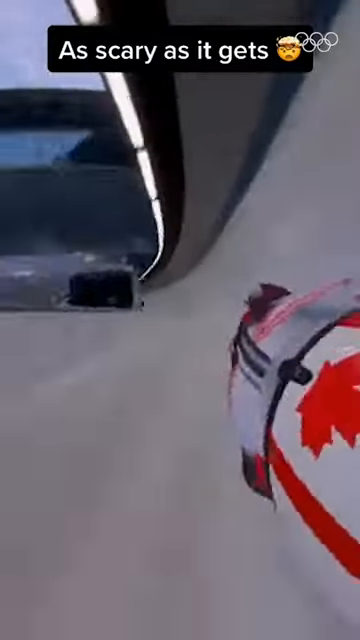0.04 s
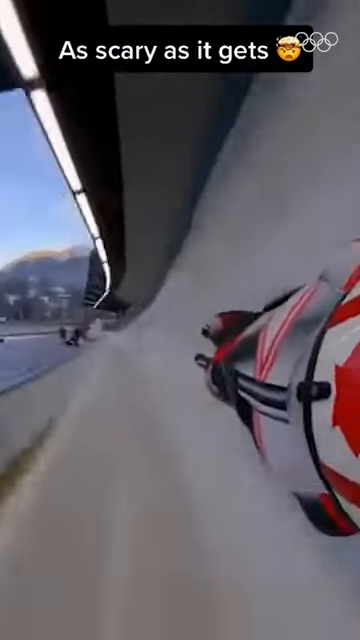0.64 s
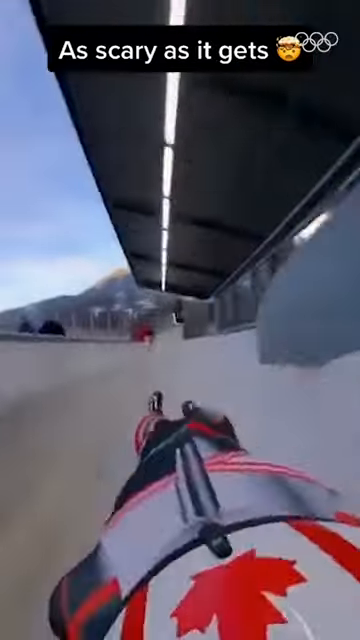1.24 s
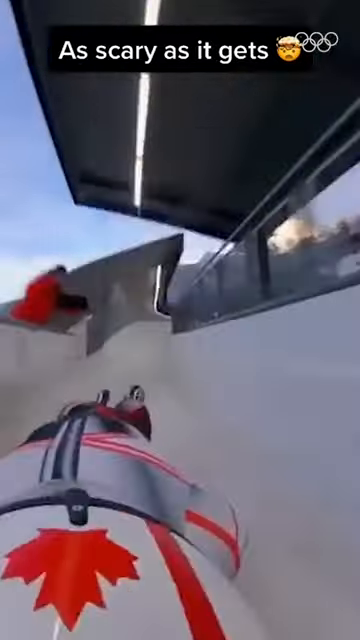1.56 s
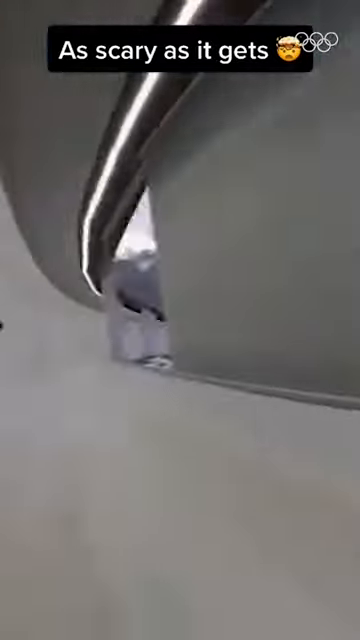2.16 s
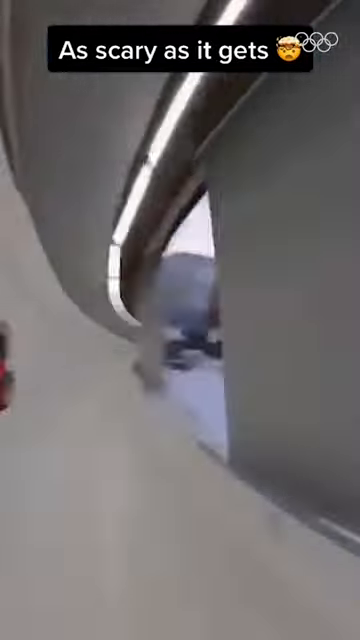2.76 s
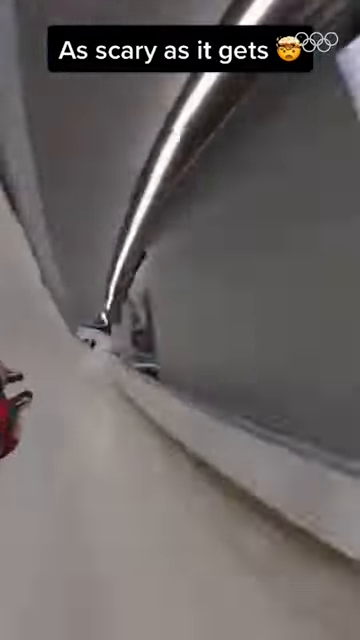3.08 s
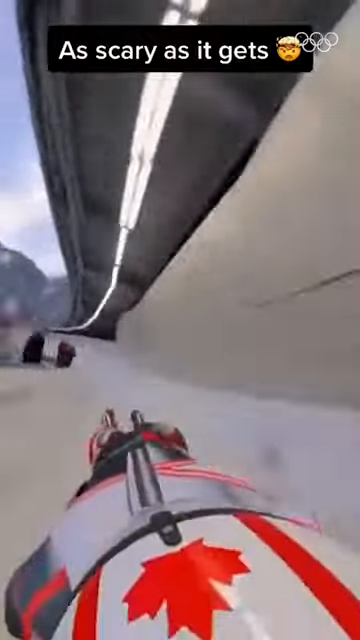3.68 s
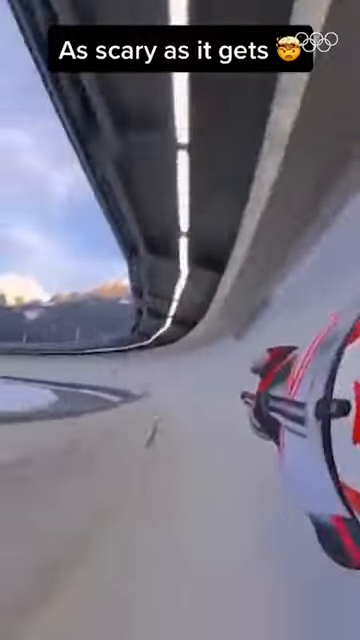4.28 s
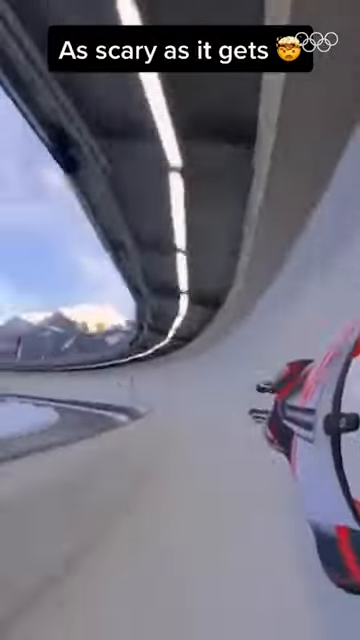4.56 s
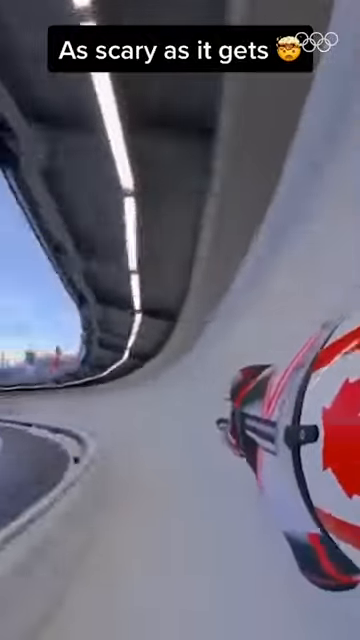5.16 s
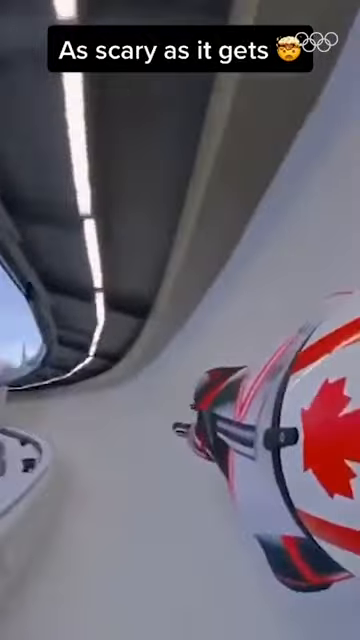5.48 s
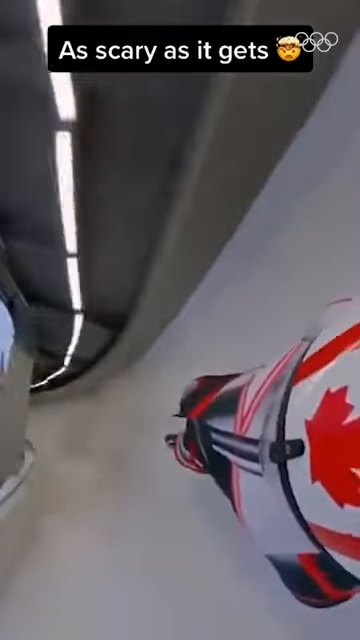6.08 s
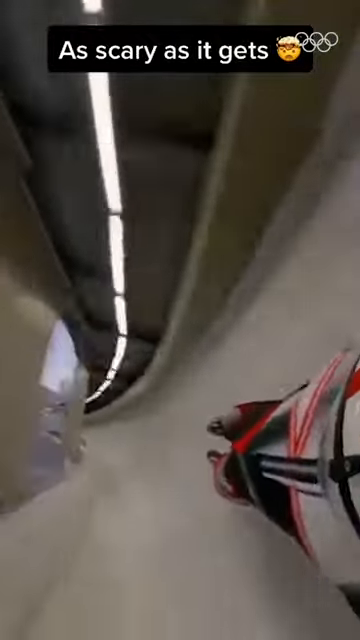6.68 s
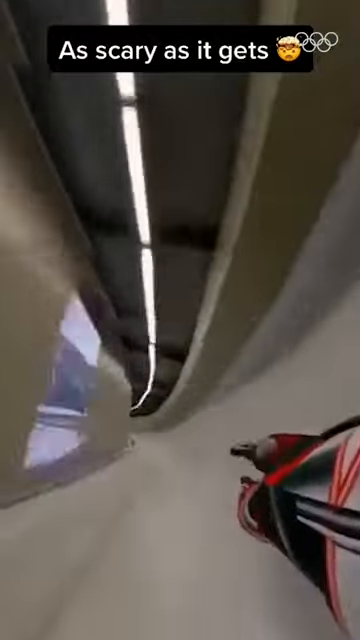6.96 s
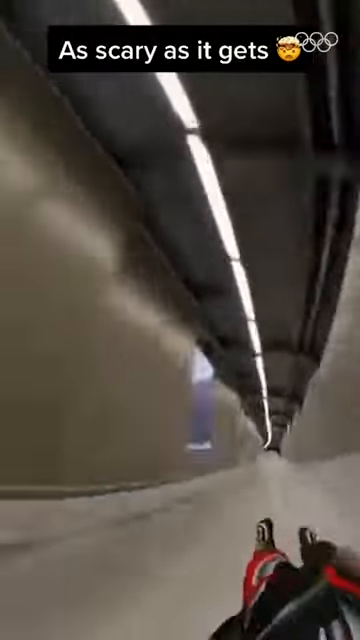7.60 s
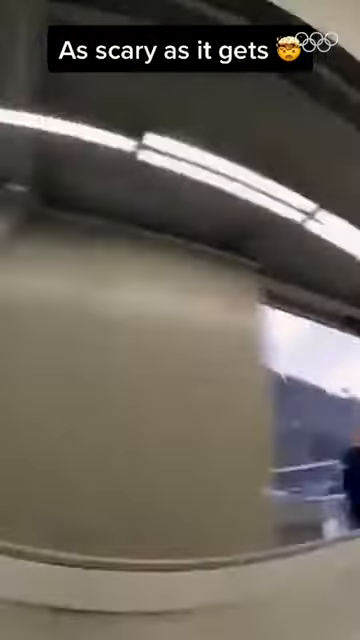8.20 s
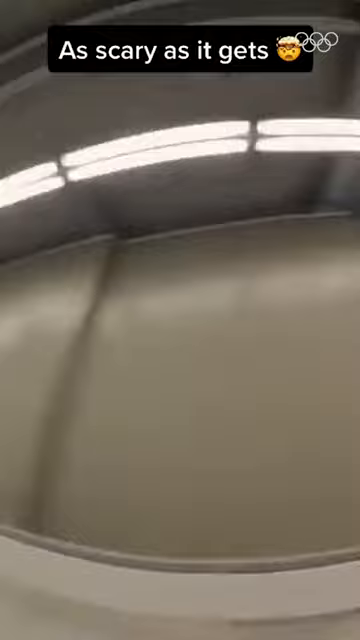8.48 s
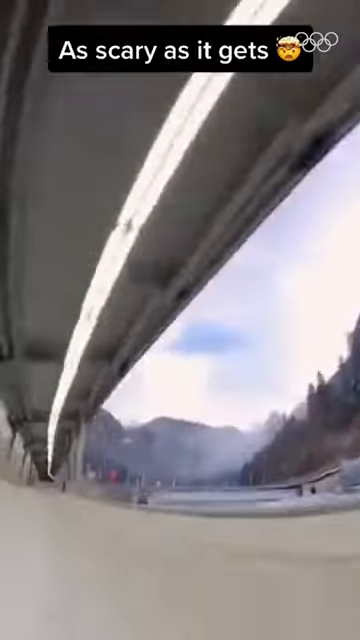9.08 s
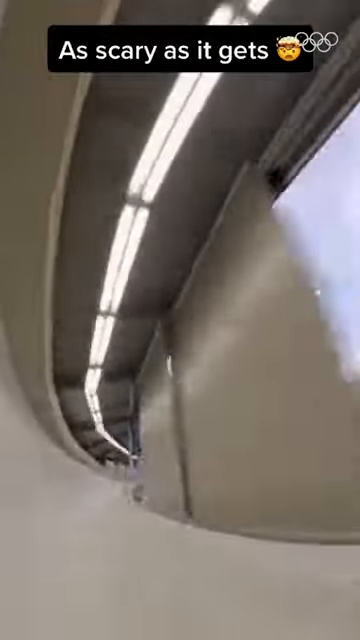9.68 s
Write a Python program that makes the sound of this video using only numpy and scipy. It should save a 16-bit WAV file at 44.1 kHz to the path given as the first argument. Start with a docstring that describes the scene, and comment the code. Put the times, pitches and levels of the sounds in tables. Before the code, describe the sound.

Gusty wind tears at the microphone over sled runners hissing on ice, then turns into a loud, deep, thudding buffet.

```python
"""Thin, gusty air tears at each port of a two-port microphone, over the hiss of steel runners on ice.
The microphone rides just behind the slider's helmet as a sled races down an ice track.
Just before 4 s a deep, fluttering buffet of large eddies swallows both ports, thudding and ripping;
from then on the runners only break through in a few short scrapes."""
import sys
import numpy as np
from scipy import signal
from scipy.fft import rfft, irfft, next_fast_len
from scipy.io import wavfile
from scipy.ndimage import uniform_filter1d

SR = 44100
rng = np.random.default_rng(int(sys.argv[2]) if len(sys.argv) > 2 else 0)


def store_pcm(level_fs):
    """Save levels as 16-bit WAV."""
    pcm = np.round(np.clip(level_fs, -1, 1) * 32767).astype(np.int16)
    wavfile.write(sys.argv[1], SR, np.atleast_2d(pcm).T)


N = 438354
GLIDE_END_S, BLAST_START_S = 3.775, 3.85
# Bands in which noise is brought to unit level, lower and upper edge in Hz.
BODY_BAND, BUFFET_BAND, TEAR_BAND, ICE_BAND = (150, 1500), (60, 1500), (1300, 4000), (6000, 9700)

# Air rips across the right port and the flow collapses behind it.
# Each row: time in seconds, level in dB, length in seconds, lift of the blast in dB, collapse in dB.
RIPS = [(3.849, -10.5, 0.016, 3, 1), (3.954, -19, 0.01, -1, -4), (3.975, -15.5, 0.0094, -5, -0.5),
        (4.469, -19, .01, 3.5, -2), (5.042, -19, .01, 0, -3), (5.653, -20, 0.051, 1.5, -1),
        (5.929, -18, 0.013, -7, -4), (6.173, -27, 0.01, 6, -10), (6.306, -24, 0.015, 4, -1.5),
        (6.533, -29, 0.0047, 4, -4.5), (6.621, -21, 0.013, 2, -4), (6.885, -32, 0.033, -0.5, -2),
        (6.917, -20, 0.015, 4, -1), (6.948, -16, 0.0099, 5, -9), (7.021, -18, 0.015, -0.5, -0.5),
        (7.056, -14.5, 0.04, 3, -5), (7.12, -27, 0.013, 3, -2), (7.219, -21, 0.038, 4.5, -3),
        (7.289, -23, 0.012, 0, 0.5), (7.389, -10, 0.022, 1.5, -0.5), (7.468, -14.5, 0.023, -2, 0),
        (7.656, -16, 0.021, 2, -4), (7.936, -24, 0.016, 1, -9), (7.988, -25, .012, -2, -2),
        (8.1, -17, 0.044, 0, -1), (8.421, -17, .01, 4, 0.5), (8.678, -30, 0.016, 2, -2),
        (8.731, -15.5, 0.028, 1, -11), (9.051, -12.5, .0085, 6, -4), (9.086, -20, 0.009, 6, 2.5)]
# The heaviest thuds of the buffet.
# Each row: time in seconds, change in dB, length in seconds, suction at its heart in dB.
THUDS = [(3.889, 4, .012, -12), (4.173, 3.5, 0.022, -7), (4.27, 1.5, 0.017, -4), (4.521, 2, 0.013, -7),
         (4.614, 1.5, 0.05, -9), (4.763, -3, .014, -4), (4.87, 1.5, 0.052, -10), (5.215, 3.5, 0.015, -3),
         (5.276, 1, 0.017, -4), (5.388, 3.5, .016, -13), (5.593, 2.5, 0.026, -3), (5.838, 1.5, .014, -12),
         (6.355, 4, .014, -8), (6.482, 6, 0.016, -11), (6.773, 5.5, 0.012, -5), (7.128, 5, .006, -4.5),
         (7.163, -2, 0.013, -3), (7.219, 1, .006, -12), (7.265, -4, .005, -11), (7.393, -2, .008, -11),
         (7.704, 5.5, 0.016, -10), (8.004, 3, 0.022, -4), (8.176, 2, 0.053, -11), (8.533, 5.5, 0.012, -12),
         (9.431, 4.5, .024, -14), (9.614, 3.5, 0.019, -8), (9.84, 2.5, .04, -5)]
# Tight vortices that hit both ports. Each row: time in seconds, level in dB, pitch in Hz.
SMACKS = [(3.95, -4, 650), (4.103, -8, 700), (5.1694, -5.5, 620), (5.947, -7, 900), (5.987, -12, 700),
          (6.2637, -1, 700), (6.5305, -6, 800), (6.8995, -3, 800), (6.9498, -4, 600), (7.003, -13, 700),
          (7.051, -5, 900), (7.283, -8, 800), (7.3675, -8, 700), (7.4467, -7, 900), (8.416, -7, 900),
          (8.961, -7, 800), (9.154, -6, 700)]
# Air sizzling, tearing and hissing at a port. Each row: frequency in Hz, spectral level in dB.
SIZZLE_COLOUR = [(150, -30), (600, -8.5), (1300, 0), (2500, 0.5), (4000, -2.5), (6000, -10), (7000, -10),
                 (9500, -10.5)]
TEAR_COLOUR = [(20, -8), (100, -15.5), (250, -16), (500, -7.5), (950, 1.5), (1500, 0.5), (2500, -2.5),
               (4000, -8), (6000, -12.5), (9500, -23)]
HISS_COLOUR = [(500, -21), (2000, -4.5), (4000, -4.5), (5600, -3.5), (7500, -0.2), (9500, 0.5)]


def blast():
    """Large eddies press on both ports, the right one first; small ones tear at each port alone."""
    # The full wind. Each row: time in seconds, then buffet, tearing and hiss levels in dB.
    wind_levels = [(3.88, -16.5, -23, -25), (4.46, -17, -23.5, -21), (4.97, -17, -24.5, -23.5),
                   (5.15, -20, -30, -22.5), (5.2, -16.5, -21, -24.5), (7.47, -18, -17.5, -26),
                   (7.52, -19.5, -19, -23.5), (8.2, -17.5, -18.5, -25), (8.33, -19.5, -19, -25),
                   (8.71, -18, -16.5, -24.5), (8.84, -19, -18, -25.5), (9.44, -18, -21.5, -24),
                   (9.54, -16.5, -37, -22.5), (9.65, -19, -21, -23.5), (9.92, -17, -34, -24.5)]
    # The buffet lets go for a moment. Each row: time in seconds, change in dB, length in seconds.
    slacks = [(3.925, -2, 0.017), (5.158, -2, .016), (6.252, -1, .014), (6.425, -9, 0.024),
              (6.518, -7, .01), (6.908, -4, 0.016), (6.936, -4, .012), (7.095, -1.5, .025), (7.26, 0, .018),
              (7.373, -5, .008), (7.58, -1, 0.017), (8.79, -3.5, 0.051), (9.0, -2.5, 0.04)]
    # Early jets graze the right port. Each row: time in seconds, level in dB, length in seconds.
    jets = [(0.763, -19, .025), (1.355, -14.5, .05), (1.458, -31, .025), (2.145, -17, 0.027),
            (2.262, -21, 0.04), (2.583, -24.5, 0.06)]
    # Large eddies, churn at the left port, rips. Each row: frequency in Hz, spectral level in dB.
    buffet_colour = [(15, -22.5), (40, -16.5), (80, -2.5), (170, -1), (300, 0.5), (450, -1.5), (700, -1.5),
                     (1000, -4), (2000, -11.5), (4000, -31), (9000, -27)]
    churn_colour = [(20, -17), (90, -8), (200, -12), (450, 8), (700, 1.5), (1100, 0.5), (2000, -3.5),
                    (3200, -8.5), (5000, -13.5), (9500, -20.5)]
    rip_colour = [(150, -25), (600, -17), (1200, 3.5), (2500, -2), (4000, -6), (6000, -16.5), (9500, -9.5)]
    lee_hz, lee_lag_s = 900, 0.00008
    hush_db, hush_s = -4, 0.007  # a dip just ahead of each smack

    buffet_db, tear_db, hiss_db = curves(wind_levels)
    hushes_db = swells([(s - 0.5 * hush_s, hush_db, hush_s) for s, _, _ in SMACKS])
    drop_db = collapses() + swells(slacks) + hushes_db
    lift_db = swells([(s, db, length) for s, _, length, db, _ in RIPS])
    push_db = thuds() + drop_db + lift_db + 1.27 * flutter(19, 70)
    eddies = flutter(110, 450)
    buffet = amp(buffet_db + push_db - 0.47) * rush(buffet_colour, BUFFET_BAND, 2.45 * eddies)
    buffet += amp(0.5 * drop_db) * vortices()

    # The left port lies in the lee: the same pressure arrives duller and a moment later.
    lee = lowpass(np.interp(clock() - lee_lag_s, clock(), buffet), lee_hz)
    churn_eddies_db = 2.2 * eddies + 1.1 * flutter(40, 900)
    churn = amp(buffet_db + push_db - 7.0) * rush(churn_colour, BUFFET_BAND, churn_eddies_db)
    # In the last curve the lee deepens and the churn loses some treble.
    churn += 0.33 * onset(9.2, 0.15) * (lowpass(churn, hz=1100) - churn)

    tear_gain = amp(tear_db + 0.88 * push_db + 0.5 * flutter(3.7, 16) - 2.5)
    tear = tear_gain * rush(TEAR_COLOUR, TEAR_BAND, 2.0 * eddies + 0.77 * flutter(25, 300))
    flaps_db = 2 * flutter(70, 250) - 1.0  # each rip is chopped into quick flaps
    tear += bursts([row[:3] for row in RIPS]) * rush(rip_colour, TEAR_BAND, flaps_db)
    ports = np.array([lee + churn, amp(-0.53) * buffet + tear]) + roar(push_db)
    ports *= onset(BLAST_START_S, 0.0074)

    # The hiss sags when the flow drops but does not grow in the thuds.
    hiss_gain = amp(hiss_db + 0.5 * drop_db - 0.1) * onset(GLIDE_END_S, 0.012) + bursts(jets)
    ports[1] += hiss_gain * rush(HISS_COLOUR, ICE_BAND, 0.89 * flutter(3.8, 200))
    return ports


def thuds(small_per_s=9, small_db=2, small_s=0.014):
    """Short lurches of the buffet in dB: the heavy ones, and small rises at random."""
    times = np.flatnonzero(rng.random(N) < small_per_s / SR) / SR
    return swells([row[:3] for row in THUDS] + [(s, small_db, small_s) for s in times])


def collapses(recover_s=0.0091):
    """The change in dB as the flow collapses behind each rip: quick to fall, slower to recover."""
    drop_db = np.zeros(N)
    age = np.maximum(np.arange(-SR // 5, SR // 5) / SR, 0) / recover_s
    for s, _, length, _, db in RIPS:
        add(drop_db, s + 0.58 * length, db * age * np.exp(1 - age))
    return drop_db


def vortices(base_hz=400, small_per_s=45, small_db=-15.5):
    """Kicks of suction: a strong one in every heavy thud, and small vortices shed all the time."""
    track = np.zeros(N)
    for s, _, _, db in THUDS:
        add(track, s, amp(db) * suction(base_hz * rng.uniform(0.64, 2.0)))
    chance, pitch, size = rng.random((3, N))
    for i in np.flatnonzero(chance < small_per_s / SR):
        kick = suction(base_hz * (0.5 + 1.5 * pitch[i]))
        add(track, i / SR, amp(small_db) * (0.5 + size[i]) * kick)
    return track


def suction(hz):
    """A vortex core passing the port: one dip in pressure between two soft shoulders."""
    phase = np.pi * hz * np.arange(-SR // 100, SR // 100) / SR
    return (2 * phase ** 2 - 1) * np.exp(-phase ** 2)


def smacks(left_lag_s=0.00015):
    """Tight vortices swing the pressure down, then up, reaching the right port first."""
    ports = np.zeros((2, N))
    t = np.arange(-SR // 100, SR // 100) / SR
    for s, db, hz in SMACKS:
        phase = 2 * np.pi * hz * t
        swing = amp(db) * phase * np.exp(0.5 * (1 - phase ** 2))
        add(ports[0], s + left_lag_s, amp(-2.0) * swing)
        add(ports[1], s, swing)
    return ports


def roar(push_db):
    """Wide, throbbing eddies that boom at both ports, rising and falling with the buffet."""
    # The roar under the buffet. Each row: time in seconds, level in dB.
    roar_levels = [(3.9, -38), (4.3, -29), (4.5, -29), (4.61, -22.5), (4.72, -24), (5.1, -30), (5.27, -26),
                   (5.38, -29), (5.9, -31), (6.7, -25), (7.7, -29.5), (8.15, -24.5), (9.1, -30),
                   (9.9, -25.5)]
    # Its deep colour. Each row: frequency in Hz, spectral level in dB.
    roar_colour = [(20, -14), (55, -3.5), (110, -3.5), (200, 0), (320, -0.5), (450, 1.5), (900, -30),
                   (4000, -60)]
    eddies_db = 2.8 * flutter(25, 160)
    shared, left, right = (rush(roar_colour, BUFFET_BAND, eddies_db) for _ in range(3))
    return amp(curves(roar_levels)[0] + push_db - 2.5) * (shared + amp(-2) * np.array([left, right]))


def thin_air():
    """The stream blows on the two ports separately until the buffet takes over."""
    # The stream at each port. Each row: time in seconds, level in dB.
    left_stream = [(0.0, -12.5), (0.23, -20), (1.19, -18.5), (1.32, -24), (1.84, -19), (2.11, -21.5),
                   (2.28, -16), (2.55, -25.5), (3.2, -20.5), (3.53, -22), (3.76, -12.5)]
    right_stream = [(0.0, -37), (0.24, -50), (0.49, -14), (0.68, -29.6), (0.79, -22), (1.45, -24.5),
                    (1.52, -19), (2.3, -24.5), (2.51, -35), (2.58, -23), (2.84, -30), (3.09, -35),
                    (3.2, -25), (3.27, -23.5), (3.56, -25.5), (3.84, -15.5)]
    # Gusts and lulls at the left port. Each row: time in seconds, change in dB, length in seconds.
    gusts = [(.11, -9, 0.017), (.165, 1.5, .03), (.32, 2.5, 0.056), (.89, 2.5, 0.13), (1.05, 1.5, 0.066),
             (1.61, 3, 0.038), (1.76, 5, 0.044), (2.39, 4, 0.024), (2.53, -7, 0.017), (2.74, -5, 0.073),
             (2.93, 1, 0.023), (2.97, -8, 0.03), (3.01, 6, 0.032), (3.41, 5.5, 0.11)]
    # The right port drops out of the stream. Each row: time in seconds, change in dB.
    lulls = [(1.07, -4), (1.68, -3.5), (1.74, -12.5), (2.44, -9), (2.76, -13), (2.88, -16), (3.01, -15)]
    # Air hoots across the left port's mouth. Each row: time in seconds, level in dB, length in seconds.
    hoots = [(1.06, -20, 0.074), (2.653, -24, 0.025), (3.138, -18, 0.029)]
    # The air at each port and the hollow hoot. Each row: frequency in Hz, spectral level in dB.
    left_colour = [(20, -35), (45, -28), (90, -20), (140, -11), (215, -3.5), (320, -1), (480, -0.5),
                   (650, 0), (1000, -8.5), (1500, -10.5), (3000, -18), (9000, -42)]
    right_colour = [(20, -27), (90, -22), (170, -13), (300, -5.5), (450, 0.5), (800, 0), (1500, -4),
                    (3000, -16), (9000, -44)]
    hoot_colour = [(300, -17), (480, -6), (660, 8), (850, -5), (1400, -24)]
    lull_s, hiss_db = 0.063, -39

    left_db = curves(left_stream)[0] + swells(gusts)
    right_db = curves(right_stream)[0] + swells([(s, db, lull_s) for s, db in lulls])
    left = port_air(left_db, left_colour, gusty_db=0.76, rough_db=2.0,
                    body_db=-1.07, sizzle_db=-11.5, follow=0.73)
    right = port_air(right_db, right_colour, gusty_db=1.0, rough_db=1.5,
                     body_db=-3.0, sizzle_db=-8.5, follow=0.71)
    left += bursts(hoots) * rush(hoot_colour, BODY_BAND)
    right += amp(hiss_db) * rush(HISS_COLOUR, ICE_BAND, flutter(5, 200))
    shelter = amp(-16 * onset(GLIDE_END_S, 0.007))  # the left port falls briefly into still air
    return np.array([left * shelter, right]) * (1 - onset(BLAST_START_S, 0.0096))


def port_air(stream_db, colour, gusty_db, rough_db, body_db, sizzle_db, follow):
    """Turbulence at one port: a body that follows the stream and a sizzle that follows it less."""
    level_db = stream_db + gusty_db * flutter(2.7, 33)
    eddies = flutter(25, 400)
    body = amp(level_db + body_db) * rush(colour, BODY_BAND, rough_db * eddies)
    sizzle = amp(sizzle_db + follow * level_db) * rush(SIZZLE_COLOUR, TEAR_BAND, 1.2 * eddies)
    return body + sizzle


def jolts(tick_s=0.0024):
    """Right on the microphone: slaps and rasps of air, dull knocks and sharp ticks on the housing."""
    # Single eddies slap one port. Each row: time in seconds, level in dB, rough pitch in Hz, port.
    slaps = [(.403, -5.5, 690, "right"), (.479, -7, 550, "right"), (.573, -1.5, 820, "right"),
             (.8, -18, 695, "right"), (1.004, -11, 550, "right"), (1.166, -10, 400, "right"),
             (1.391, -8.5, 495, "left"), (1.528, -9.5, 550, "right"), (1.574, -15, 385, "right"),
             (1.758, -6, 630, "left"), (1.829, -7, 550, "right"), (2.035, -4, 700, "right"),
             (2.278, -8, 500, "right"), (2.553, -14, 700, "right"), (2.653, -15, 446, "left"),
             (2.667, -12, 660, "right"), (2.81, -20, 750, "right"), (2.928, -10, 810, "left"),
             (3.089, -6, 447, "right"), (3.188, -13, 500, "left"), (3.269, -9, 550, "right"),
             (3.761, -4, 766, "right")]
    # Knocks at the left port. Each row: time in seconds, level in dB.
    knocks = [(0.129, -31), (0.187, -33), (2.353, -29), (2.381, -32), (2.476, -32), (2.514, -35),
              (2.598, -33), (2.878, -28)]
    # Rasps in the thin stream. Each row: time in seconds, level in dB, length in seconds, port.
    rasps = [(0.046, -17, 0.007, "left"), (0.075, -22, 0.014, "left"), (0.964, -27, .012, "right"),
             (1.156, -22, 0.013, "left"), (1.22, -22, .03, "right"), (1.633, -25, .04, "right"),
             (1.853, -19, .03, "right"), (2.65, -29, 0.041, "left"), (2.881, -22.5, .018, "left"),
             (1.76, -17, 0.0095, "left"), (2.034, -19.5, .01, "right"), (2.475, -21, 0.021, "left"),
             (2.597, -24, 0.013, "left"), (2.601, -23, .012, "right"), (2.695, -24.5, 0.02, "left"),
             (2.809, -26, 0.016, "right"), (2.926, -26, 0.015, "left"), (2.935, -23, .012, "right"),
             (3.02, -24, 0.014, "left"), (3.08, -22, .012, "right"), (3.135, -18, 0.02, "left")]
    # Ticks like ice chips striking the left port. Each row: time in seconds, level in dB.
    ticks = [(.166, -8), (.173, -14), (2.879, -11), (2.886, -17), (2.929, -15)]
    ports = np.zeros((2, N))
    for s, db, hz, port in slaps:
        add(ports[int(port == "right")], s, amp(db + 0.5) * puff(hz, decay_s=0.0011))
    for s, db in knocks:
        add(ports[0], s, amp(db + 14.0) * puff(hz=85, decay_s=0.0015))
    for track, side in zip(ports, ("left", "right")):
        rasp_gain = amp(3.5) * bursts([(s, db, length) for s, db, length, port in rasps if port == side])
        track += rasp_gain * rush(SIZZLE_COLOUR, TEAR_BAND, 1.5 * flutter(60, 400))
    ports[0] += bursts([(s, db, tick_s) for s, db in ticks]) * rush(TEAR_COLOUR, TEAR_BAND)
    return ports


def puff(hz, decay_s):
    """A short pressure kick swinging at roughly hz, centred in its window; peak 1."""
    t = np.arange(-SR // 20, SR // 20) / SR
    swing = np.sin(2 * np.pi * hz * rng.uniform(0.75, 1.34) * t + rng.uniform(0, 2 * np.pi))
    kick = swing * np.exp(-abs(t) / decay_s)
    return kick / abs(kick).max()


def runners():
    """Steel on ice: a gritty grinding that fills the track; a bright hiss, the same in both channels."""
    # The runners gliding. Each row: time in seconds, level in dB.
    glide_levels = [(0.0, -22.5), (0.25, -27), (0.31, -24.5), (1.63, -22), (1.75, -24.5), (1.84, -23),
                    (2.09, -27), (2.15, -23.5), (2.28, -21.5), (2.55, -31.5), (2.78, -29), (2.84, -25.5),
                    (3.07, -25), (3.14, -23), (3.76, -22)]
    # The runners skidding. Each row: time in seconds, level in dB, length in seconds.
    skids = [(0.04, -41, .07), (2.59, -29, 0.037), (0.565, -30, .03), (1.083, -32, 0.056), (1.84, -31, .04),
             (3.19, -41, 0.08), (3.355, -27, 0.03), (3.414, -36, 0.037), (4.232, -30, 0.029),
             (4.358, -22.5, 0.058), (4.99, -30.5, 0.065), (6.44, -31, .064), (8.179, -24.5, 0.087)]
    # The right port is shaded from the grinding at first. Each row: time in seconds, change in dB.
    shade = [(0.0, -3.5), (0.22, -7), (0.3, 0), (0.38, -4), (0.43, -1)]
    # The grinding and the hiss of the steel. Each row: frequency in Hz, spectral level in dB.
    grind_colour = [(100, -42), (350, -14.5), (1200, -3.5), (2500, -5), (4000, -3), (5300, -2), (6200, -9),
                    (7500, -9.5), (9700, -7.5)]
    steel_colour = [(1000, -33), (4500, -23), (6000, -2.5), (6600, -1), (7500, 0), (8600, 2), (9700, 1)]
    glide_gain = amp(curves(glide_levels)[0]) * (1 - onset(GLIDE_END_S, 0.01))
    chatter_db = 0.65 * flutter(3.4, 200)  # the ice is never quite smooth
    grind = np.array([amp(port_db) * rush(grind_colour, TEAR_BAND, chatter_db) + amp(-4) * grit()
                      for port_db in (-2.5, -3.3)])
    grind *= amp(1.5 * flutter(4.6, 50))  # the steel bites in short surges
    grind[1] *= amp(curves(shade)[0])
    hiss = amp(-2.5) * rush(steel_colour, ICE_BAND, chatter_db + 0.95 * flutter(3, 30))
    return (glide_gain + bursts(skids)) * (grind + hiss)


def grit(grains_per_s=900, spread_db=3, band_hz=(1600, 5200)):
    """Ice grains crack as they are crushed under the steel; unit level."""
    size = amp(-np.minimum(rng.exponential(1, N), spread_db)) * rng.choice([-1, 1], N)
    cracks = size * (rng.random(N) < grains_per_s / SR)
    crackle = signal.lfilter(*signal.butter(2, band_hz, "bandpass", fs=SR), cracks)
    return crackle / crackle.std()


def shift_colour(ports, narrow_db, broad_db):
    """The colour of the noise shifts in short random patches, narrow and broad."""
    hz, _, spectra = signal.stft(ports, SR, nperseg=1024, noverlap=768)

    def patches(bins, frames):
        field = rng.standard_normal(spectra.shape[:0:-1]).T
        field = uniform_filter1d(uniform_filter1d(field, bins, 0), frames, 1)
        return field / field.std()

    upper = (hz / (hz + 350))[:, None]  # the narrow patches are stronger higher up
    gain = amp(narrow_db * upper * patches(bins=3, frames=7) + broad_db * patches(bins=12, frames=11))
    gain /= np.sqrt(np.mean(gain ** 2, axis=1, keepdims=True))
    return signal.istft(spectra * gain, SR, nperseg=1024, noverlap=768)[1][:, :N]


def rush(colour, band, eddies_db=0):
    """Noise broken into eddies, then coloured; unit level inside the band."""
    count = next_fast_len(N, True)
    hz = np.fft.rfftfreq(count, 1 / SR)
    colour_hz, colour_db = np.transpose(colour)
    spectrum = rfft(rng.standard_normal(N) * amp(eddies_db), count)
    spectrum *= amp(np.interp(np.log(hz + 1), np.log(colour_hz), colour_db))
    inside = (hz > band[0]) & (hz < band[1])
    band_power = 2 * np.sum(abs(spectrum[inside]) ** 2) / (N * count)
    return irfft(spectrum, count)[:N] / np.sqrt(band_power)


def flutter(slow_hz, fast_hz):
    """Random unsteadiness of unit size between two rates."""
    count = next_fast_len(N // 8)
    hz = np.fft.rfftfreq(count, N / count / SR)
    weight = hz ** 2 / (hz ** 2 + slow_hz ** 2) / np.sqrt(hz + slow_hz) / (1 + (hz / fast_hz) ** 2)
    wobble = irfft(rfft(rng.standard_normal(count)) * weight, count)
    return np.interp(np.arange(N), np.linspace(0, N, count), wobble / wobble.std())


def swells(rows):
    """Smooth bumps. Each row: centre in seconds, height, length at half height in seconds."""
    track = np.zeros(N)
    for s, height, length in rows:
        add(track, s, height * np.hanning(max(int(2 * length * SR), 3)))
    return track


def bursts(rows):
    """Swells of gain out of silence, their heights given in dB."""
    return swells([(s, amp(db), length) for s, db, length in rows])


def add(track, s, sound):
    """Adds a short sound, centred on s seconds."""
    start = round(s * SR) - len(sound) // 2
    part = track[max(start, 0):max(start + len(sound), 0)]
    part += sound[max(-start, 0):][:len(part)]


def curves(rows):
    """Each column after the times, joined by straight lines."""
    s, *columns = np.transpose(rows)
    return [np.interp(clock(), s, column) for column in columns]


def onset(s, length):
    """A smooth rise from 0 to 1 around s seconds."""
    return 0.5 + 0.5 * np.tanh((clock() - s) / length)


def lowpass(sound, hz):
    """Gently dulls a sound above hz."""
    return signal.lfilter(*signal.butter(1, hz, fs=SR), sound)


def amp(db):
    """Decibels to gain."""
    return np.exp(np.asarray(db) * (np.log(10) / 20))


def clock():
    """The time of every sample in seconds."""
    return np.arange(N) / SR


def scene():
    """Wind, runners and jolts at the left and right ports, just behind the helmet."""
    breeze = shift_colour(thin_air(), narrow_db=3.5, broad_db=1.1)
    ice = shift_colour(runners(), narrow_db=4.0, broad_db=1.35)
    wind = shift_colour(blast(), narrow_db=3.5, broad_db=0.55)
    return breeze + ice + wind + smacks() + jolts()


def record(dry):
    """The strongest peaks are rounded off, then the top of the treble is cut away."""
    ceiling, edge_hz = 1.05, 9850
    rounded = ceiling * np.tanh(amp(0.55) * dry / ceiling)
    band_limit = signal.firwin(701, edge_hz, window=("kaiser", 9), fs=SR)
    return signal.oaconvolve(rounded, band_limit[None], "same")


dry = scene()
out = record(dry)
store_pcm(out)
```